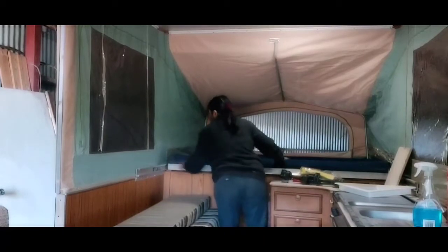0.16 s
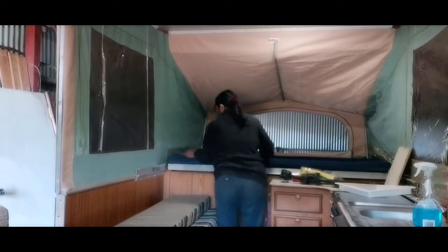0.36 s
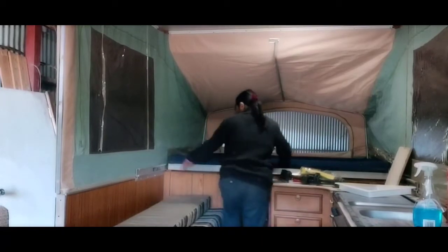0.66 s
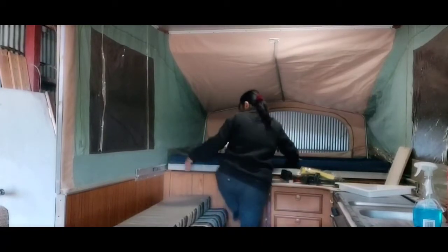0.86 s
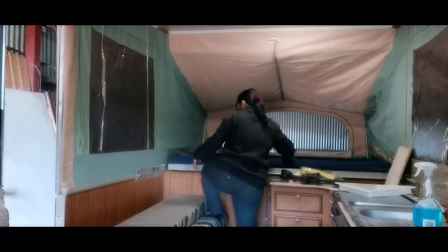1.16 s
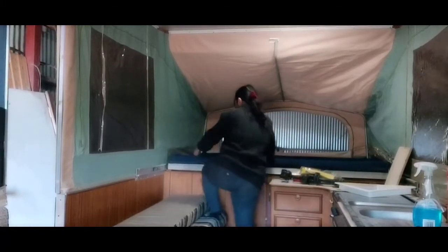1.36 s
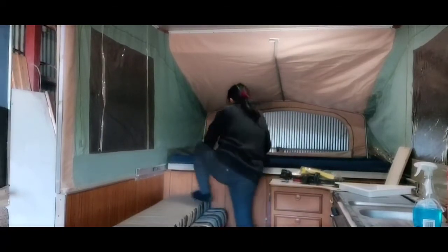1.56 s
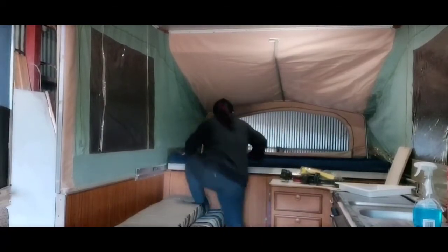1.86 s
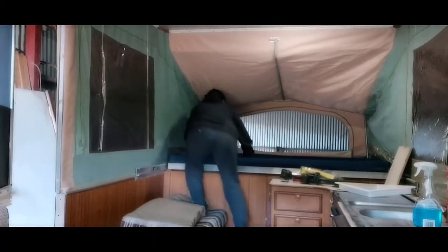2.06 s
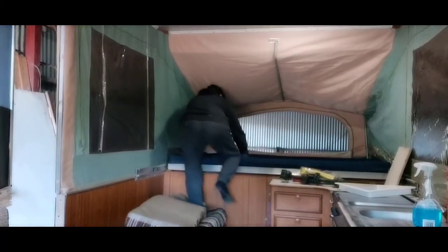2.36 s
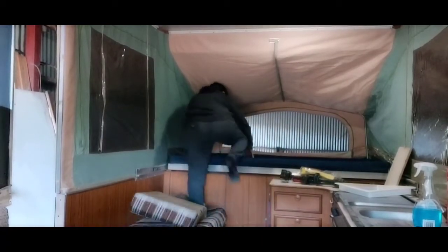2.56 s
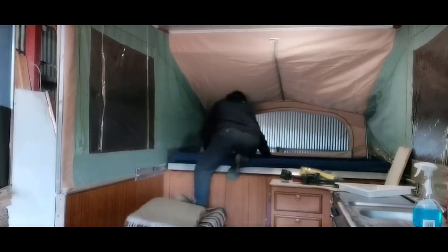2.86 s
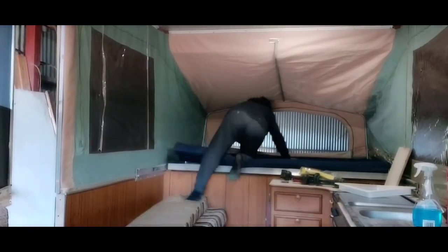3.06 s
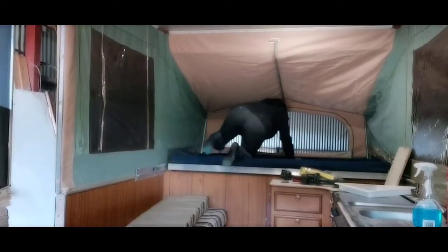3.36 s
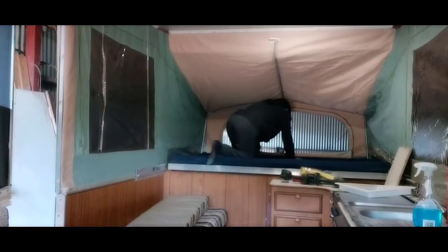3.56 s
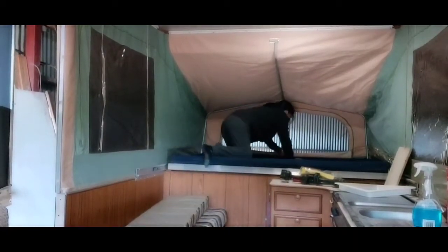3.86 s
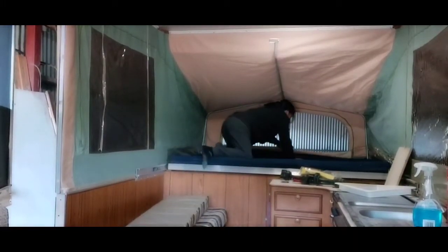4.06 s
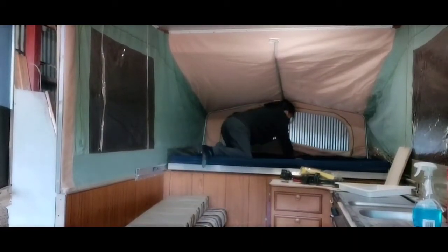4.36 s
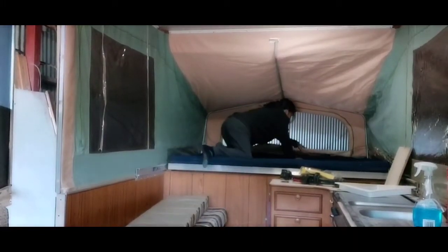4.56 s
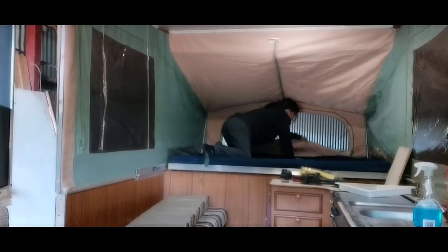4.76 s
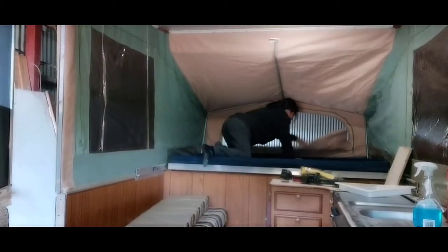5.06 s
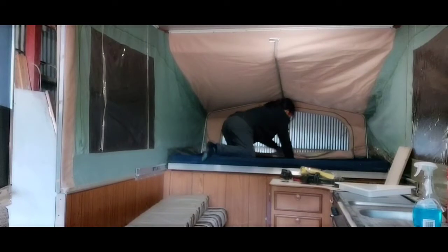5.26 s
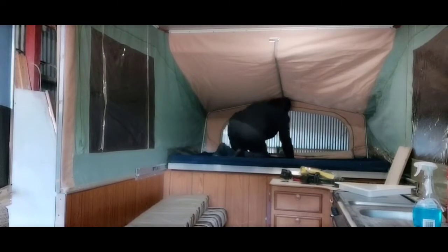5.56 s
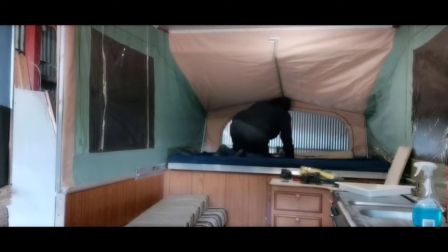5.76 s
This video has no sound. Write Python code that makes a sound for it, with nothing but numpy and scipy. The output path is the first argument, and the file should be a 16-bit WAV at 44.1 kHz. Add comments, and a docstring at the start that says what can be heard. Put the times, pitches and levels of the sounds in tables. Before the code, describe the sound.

A few metres away in a small, dry tent caravan, cloth swishes over bedding. A sharp hand knock on wood comes first, then low padded thumps, bassy wind puffs mostly on the left of the stereo microphone, and metallic clicks as weight climbs onto the bunk. From about four seconds stiff canvas crackles and snaps in short tugs, loudest near the end, with dull knee bumps beneath.

```python
"""Clothes and bedding rub as someone clambers from a bench onto the mattress of a small tent caravan, a few metres
from the microphone: coloured noise and random snags swell with every move. A canvas window flap crackles, creases
and squeaks; knees and hands bump the wooden bunk and knock its edge, and metal fittings click, as noise bursts
with ringing modes. A draught puffs on the two microphone ports as short runs of pressure dips.
The little cabin adds a short, dry echo of decaying noise."""
import sys
import numpy as np
from scipy import signal
from scipy.fft import rfft, irfft
from scipy.io import wavfile
from scipy.ndimage import uniform_filter1d

SR = 44100
rng = np.random.default_rng(int(sys.argv[2]) if len(sys.argv) > 2 else 0)


def unload_wav(signal):
    """Save mono or channel-first audio to the path in sys.argv[1] as 16-bit WAV at rate SR, clipped to [-1, 1]."""
    wavfile.write(
        sys.argv[1],
        SR,
        np.round(np.clip(np.atleast_2d(signal).T, -1, 1) * 32767).astype(np.int16),
    )


N = 261072
T = np.arange(N) / SR
RING = T[:SR // 2]  # the half second in which a struck thing or an echo dies away
CABIN_T60_S = 0.19


def undb(db):
    """Decibels to gain."""
    return 10 ** (np.asarray(db) / 20)


def unit(x):
    """Scale to rms 1."""
    return x / np.sqrt(np.mean(x ** 2))


def norm(x):
    """Scale each channel of a response to energy 1."""
    return x / np.sqrt(np.sum(x ** 2, axis=-1, keepdims=True))


def peak(x):
    """Scale to peak 1."""
    return x / np.abs(x).max()


def colour(x, points):
    """Weight a sound's spectrum by (pitch_hz, level_db) points, joined along a logarithmic pitch axis."""
    hz, db = np.transpose(points)
    size = x.shape[-1]
    f = np.maximum(np.fft.rfftfreq(size, 1 / SR), 1)
    gain = undb(np.interp(np.log(f), np.log(hz), db))
    return irfft(rfft(x) * gain, size)


def butter(x, hz, kind, order=2):
    """Plain low-pass or high-pass."""
    sections = signal.butter(order, min(hz, SR / 2 - 1), kind, fs=SR, output="sos")
    return signal.sosfilt(sections, x)


def add(out, s, x):
    """Mix a sound in at time s."""
    i = int(s * SR)
    out[..., i:i + x.shape[-1]] += x[..., :N - i]


def through(x, response):
    """Play a sound through a stereo response."""
    return signal.fftconvolve(np.atleast_2d(x), response, axes=-1)[:, :N]


def fade(t60):
    """Exponential decay, 60 dB down after t60 seconds."""
    return np.exp(-np.log(1000) * RING / t60)


def walk(rate):
    """Smoothed chance with rms near 1, taking a new value rate times a second."""
    k = int(SR / rate)
    steps = np.repeat(rng.standard_normal(N // k + 1), k)
    return unit(uniform_filter1d(steps, k))[:N]


def field(size, apart_hz=850, side_db=-1):
    """Diffuse noise at two close ports: the bass is shared, the treble nearly unrelated."""
    mid, side = rng.standard_normal((2, size))
    side = undb(side_db) * butter(side, apart_hz, "high")
    return np.array([mid + side, mid - side])


def body(modes, points, crack_t60, ring_db, cabin_db, vary_db=2):
    """A struck thing: a dense crack, its ringing modes and the cabin's echo; mode levels vary from blow to blow."""
    crack = norm(colour(field(len(RING)), points) * fade(crack_t60))
    ring = 0
    for hz, db, t60 in modes:
        # short waves reach the ports out of step
        phase = rng.uniform(-np.pi, np.pi, (2, 1)) * min(hz / 2000, 1)
        level = undb(db + vary_db * rng.standard_normal())
        ring = ring + level * fade(t60) * np.sin(2 * np.pi * hz * RING + phase)
    echo = norm(colour(field(len(RING)), points) * fade(CABIN_T60_S))
    return crack + undb(ring_db) * norm(ring) + undb(cabin_db) * echo


def patchy(x, depth_db):
    """Brief narrow patches of the spectrum swell and sink, as creases do at their own pitches."""
    spectrum = signal.stft(x, nperseg=512)[2]
    chance = rng.standard_normal(spectrum.shape[1:])
    chance = uniform_filter1d(chance, size=5, axis=0)  # neighbouring pitches move together
    chance = unit(uniform_filter1d(chance, size=3, axis=1))  # and hold for a moment
    return signal.istft(spectrum * undb(depth_db * chance))[1][:, :N]


def rub(points, rate, spread_db, grain_db, flutter_db, patchy_db, comb_db):
    """Friction: fibres snag and let go over a smooth hiss; the near walls scatter the snags and comb the hiss."""
    sizes = undb(spread_db * np.minimum(rng.exponential(size=N), 4))
    snags = (rng.random(N) < rate / SR) * rng.choice([-1, 1], N) * sizes
    scatter = norm(field(len(RING)) * (fade(.012) + undb(-17) * fade(CABIN_T60_S)))
    reflected = through(rng.standard_normal(N), field(len(RING)) * fade(CABIN_T60_S))
    hiss = unit(field(N)) + undb(comb_db) * unit(reflected)
    sound = unit(hiss) + undb(grain_db) * unit(through(snags, scatter))
    sound = patchy(colour(sound, points), patchy_db)
    return unit(sound * undb(flutter_db * walk(45)))


STROKE_SHAPE = 1.31  # 1 is a pointed swell, 2 a round bell


def strokes(rows, rest_db=-120):
    """Gain over time of (peak_s, rise_s, fall_s, level_db) strokes: each swells and dies away, and powers add."""
    power = undb(rest_db) ** 2
    for s, rise, fall, db in rows:
        away = np.abs(T - s) / np.where(T < s, rise, fall)
        power = power + (undb(db) * np.exp(-away ** STROKE_SHAPE)) ** 2
    return np.sqrt(power)


# a limb moves on the bed, sliding its sleeve or trouser leg and pressing on the bedding:
# fastest_s, rise_s, fall_s, slide_db, press_db (cushions and rumble add a gain to press_db)
LIMB_MOVES = [(0.032, 0.34, 0.35, -57.5, -58), (0.24, 0.014, 0.12, -50, -51),
              (0.34, 0.04, 0.14, -53, -57.5), (0.55, 0.2, 0.14, -56, -56.5),
              (0.72, 0.057, 0.08, -60.5, -57.5), (0.95, 0.29, 0.2, -71, -62),
              (1.17, 0.034, 0.058, -56, -43), (1.38, 0.19, 0.072, -66, -59),
              (1.59, 0.097, 0.16, -53, -57.5), (1.716, 0.065, 0.035, -47.5, -55.5),
              (1.97, 0.081, 0.1, -61, -52), (2.33, 0.22, 0.18, -75, -63.5), (2.6, 0.082, 0.092, -64.5, -62),
              (2.89, .015, 0.093, -55, -66), (3.008, 0.069, 0.064, -48, -48.5),
              (3.231, 0.084, 0.049, -48, -51.5), (3.735, 0.029, 0.081, -58, -56),
              (3.85, 0.045, 0.036, -57, -53), (4.01, 0.046, 0.065, -56, -54),
              (4.311, 0.15, 0.048, -53, -59.5), (4.555, 0.13, 0.09, -61, -62),
              (4.79, 0.063, 0.028, -55, -71), (4.93, 0.064, 0.085, -53, -54.5),
              (5.03, 0.028, 0.058, -54, -54), (5.25, 0.053, 0.051, -52, -56),
              (5.425, 0.065, 0.073, -41, -59), (5.6, 0.043, 0.031, -57.5, -59.5),
              (5.739, 0.017, 0.024, -52, -57), (5.8, 0.027, 0.036, -51.5, -56),
              (5.905, 0.054, 0.066, -54.5, -56)]


def sliding(rest_db):
    """How strongly cloth slides over cloth, never quite still."""
    return strokes([(s, rise, fall, slide) for s, rise, fall, slide, press in LIMB_MOVES], rest_db)


def pressing(rest_db, gain_db=0):
    """How hard the limbs work into the bedding, never quite at rest."""
    return strokes([(s, rise, fall, press + gain_db) for s, rise, fall, slide, press in LIMB_MOVES], rest_db)


# spectrum of sleeves and trouser legs: pitch_hz, level_db
CLOTHES_COLOUR = [(1200, -17), (2200, 2), (3700, -1), (6000, -0.5), (8500, -4), (12000, -5), (15500, -7)]
# spectrum of the mattress cover: pitch_hz, level_db
COVER_COLOUR = [(450, 1.5), (750, 1.5), (1000, 2), (1500, -2), (2300, -8), (3500, -12.5), (7000, -38)]
# spectrum of the cushions: pitch_hz, level_db
CUSHION_COLOUR = [(150, -5), (260, -2), (400, -1), (600, -10.5), (850, -18.5), (1400, -37), (3000, -66)]
# the body is never quite still: steady level of each rubbing
CLOTHES_REST_DB, COVER_REST_DB, CUSHION_REST_DB = -72, -64, -58
CUSHION_GAIN_DB = 2  # cushion scuff relative to the press
FIDGET_DB, FIDGET_PER_S = 1.5, 5


def fabrics():
    """Clothes swish grainily as they slide; pressed cover scrapes and cushions scuff dully, in fits and starts."""
    clothes = sliding(CLOTHES_REST_DB) * rub(
        CLOTHES_COLOUR, rate=1000, spread_db=1.0, grain_db=-4.5, flutter_db=1.0, patchy_db=1.86, comb_db=4.5)
    cover = pressing(COVER_REST_DB) * rub(
        COVER_COLOUR, rate=200, spread_db=3.0, grain_db=-5, flutter_db=0.5, patchy_db=1.5, comb_db=-9)
    cushion = pressing(CUSHION_REST_DB, gain_db=CUSHION_GAIN_DB) * rub(
        CUSHION_COLOUR, rate=150, spread_db=1, grain_db=-6.5, flutter_db=2.0, patchy_db=1.5, comb_db=-14)
    return (clothes + cover + cushion) * undb(FIDGET_DB * walk(FIDGET_PER_S))


# spectrum of the stiff canvas: pitch_hz, level_db
CANVAS_COLOUR = [(750, -37), (1150, 2), (1450, 4.5), (2200, 4.5), (2900, 1.5), (4000, -11), (5500, -7.5),
                 (8000, -13.5)]
# the canvas window flap is tugged: fastest_s, rise_s, fall_s, level_db
FLAP_TUGS = [(3.99, 0.037, 0.038, -49.5), (4.26, 0.17, 0.11, -58), (4.53, 0.0088, 0.035, -53.5),
             (4.795, 0.021, 0.039, -52), (5.02, 0.17, 0.15, -58.5), (5.22, 0.035, 0.039, -53.5),
             (5.36, 0.0097, 0.054, -48), (5.412, 0.058, 0.072, -44), (5.8, 0.059, 0.068, -52.5)]
# a stiff fold of canvas or mattress cover snaps or scrapes over:
# start_s, peak level_db, pitch_hz, width_octaves (2 at most is used), t60_s
FOLD_SNAPS = [(0.312, -43, 2780, .35, .11), (0.381, -45, 2900, .3, 0.088), (0.685, -45, 990, .25, 0.095),
              (0.716, -43, 980, 0.24, 0.11), (0.728, -46.5, 1880, .25, .07), (3.704, -41, 900, 1.3, .04),
              (3.95, -45.5, 1900, 0.43, 0.11), (3.976, -38.5, 1590, .7, .05), (4.011, -40, 2200, 1, .06),
              (4.129, -44.5, 1580, .3, 0.045), (4.223, -44.5, 1500, 0.34, 0.065),
              (4.275, -44.5, 2580, 0.65, 0.17), (4.307, -41, 1700, 1.6, .05), (4.525, -46, 2430, 1, .05),
              (4.548, -40.5, 1700, 1.2, .05), (4.745, -42.5, 2330, 0.46, 0.054), (4.787, -38, 1800, 1, .07),
              (4.97, -41.5, 1390, .35, .07), (5.014, -38, 1190, 0.82, .04), (5.026, -37, 2400, 1.1, 0.095),
              (5.254, -39, 1150, .7, 0.044), (5.347, -38, 2070, 0.88, 0.055),
              (5.386, -34, 2700, 0.66, 0.08), (5.42, -33, 2600, 1.1, .05), (5.736, -50, 2880, .2, .12),
              (5.788, -41.5, 1350, .5, 0.084), (5.798, -39.5, 2830, 1.2, .06)]


def flap():
    """Stiff canvas crackles as it is drawn along; now and then a fold snaps over and rasps at its own pitch."""
    crackle = rub(
        CANVAS_COLOUR, rate=150, spread_db=3, grain_db=3, flutter_db=1.5, patchy_db=4, comb_db=0.5)
    out = strokes(FLAP_TUGS) * crackle
    for s, db, hz, octaves, t60 in FOLD_SNAPS:
        reach = 2 ** min(octaves, 2)
        points = [(100, -60), (hz / reach, -24), (hz, 0), (hz * reach, -17), (15000, -38)]
        fold = colour(field(len(RING)), points)
        snap = fold * (fade(t60) + undb(-16) * fade(CABIN_T60_S))
        add(out, s, undb(db) * peak(snap))
    return out


CREASES_PER_S, CREASE_HZ = 130, 2333
CREASE_REACH_OCTAVES = 1.334  # pitches lie this far either way
CREASE_DECAY_CYCLES = 6.25  # to fall to 1/e
CREASE_DB, CREASE_SPREAD_DB = -9.5, 2.5  # relative to the cloth's motion; scatter of sizes


def creases():
    """Small creases buckle one by one in tiny pitched crackles, louder the more the cloth is moving."""
    out = np.zeros((2, N))
    t = RING[:SR // 20]
    for when, pitch, size, lag in rng.random((int(CREASES_PER_S * N / SR), 4)):
        hz = CREASE_HZ * 2 ** (CREASE_REACH_OCTAVES * (2 * pitch - 1))
        # opposite phase shifts at the two ports, larger for short waves
        phase = np.array([[1], [-1]]) * (2 * lag - 1) * min(hz / 2000, 2)
        ring = np.sin(2 * np.pi * hz * t + phase) * np.exp(-hz * t / CREASE_DECAY_CYCLES)
        level = undb(CREASE_SPREAD_DB * min(-np.log(1 - size), 3))
        add(out, when * N / SR, level * ring)
    motion = np.hypot(strokes(FLAP_TUGS), sliding(CLOTHES_REST_DB) / 2)
    return undb(CREASE_DB) * unit(out) * motion


# thin squeaks while the flap is handled: start_s, level_db, length_s
THIN_SQUEAKS = [(4.609, -67, 0.031), (5.04, -59, 0.082), (5.15, -61, 0.079)]
SQUEAK_HZ = 11300


def squeaks():
    """A small hard part slides and sings briefly in one narrow band."""
    out = np.zeros((2, N))
    band = [(SQUEAK_HZ * .92, -40), (SQUEAK_HZ, 0), (SQUEAK_HZ * 1.08, -40)]
    tone = unit(colour(field(N), band))
    for s, db, length in THIN_SQUEAKS:
        i, size = int(s * SR), int(length * SR)
        add(out, s, undb(db) * np.hanning(size) * tone[:, i:i + size])
    return out


# hands, knees and feet land on the bunk:
# start_s, level_db (peak, before a 3 dB cut), landing_s (time the weight takes), hardness_hz (low-pass)
BUNK_BUMPS = [(0.231, -24.5, 0.0027, 600), (0.252, -24.5, 0.07, 135), (1.142, -20, 0.024, 230),
              (1.162, -22, 0.018, 250), (1.204, -22.5, 0.039, 252), (1.935, -31, 0.069, 600),
              (2.129, -36, 0.066, 160), (2.276, -38, 0.017, 398), (2.603, -19.5, 0.002, 131),
              (2.87, -33, 0.0024, 595), (2.911, -30.5, 0.021, 380), (2.953, -32, 0.0028, 350),
              (2.994, -30.5, 0.025, 397), (3.228, -30, 0.023, 553), (3.685, -24.5, 0.005, 160),
              (3.714, -31, 0.038, 382), (3.821, -32.5, 0.026, 300), (4.021, -36, 0.027, 350),
              (4.531, -32.5, 0.025, 302), (5.035, -30, 0.031, 350), (5.346, -27.5, 0.0016, 1200),
              (5.605, -30.5, 0.035, 241), (5.888, -37.5, .006, 600)]
# ringing modes of the bunk's frame: pitch_hz, level_db, t60_s
FRAME_MODES = [(116.4, 3, 0.17), (135.7, 0, 0.26), (176, 9.5, 0.13), (221.6, -2.5, 0.14), (340.3, -1, 0.24),
               (426, 0, 0.058)]
# spectrum of a padded blow: pitch_hz, level_db
THUD_COLOUR = [(30, -51), (80, 7.5), (150, 12), (400, -4.5), (900, -22), (2500, 1), (8000, -44)]
# spectrum of the rumbling bunk: pitch_hz, level_db
RUMBLE_COLOUR = [(20, -19), (40, -24), (65, -4), (105, 3.5), (165, -0.5), (230, -6.5), (330, -23.5),
                 (700, -43)]
RUMBLE_GAIN_DB, RUMBLE_REST_DB = 4.5, -50  # relative to the press; under a resting body
LURCH_DB, LURCH_PER_S = 1.5, 18  # the weight shifts unevenly, so the rumble comes and goes


def bunk():
    """Soft, padded blows set the wooden frame booming; it rumbles on as the weight shifts."""
    out = np.zeros((2, N))
    for s, db, length, hard_hz in BUNK_BUMPS:
        t = np.arange(int(length * SR)) / SR
        push = 0.97 * unit(rng.standard_normal(len(t))) * np.exp(-t / length) / np.sqrt(len(t))
        push[0] -= .7  # first touch, then the padding crushes
        frame = body(FRAME_MODES, THUD_COLOUR, crack_t60=0.084, ring_db=5.5, cabin_db=6.0)
        boom = signal.fftconvolve(push[None], frame, axes=-1)
        add(out, s, undb(db - 3.0) * peak(butter(boom, hard_hz, "low")))
    rumble = unit(colour(field(N, apart_hz=243), RUMBLE_COLOUR) * undb(LURCH_DB * walk(LURCH_PER_S)))
    return out + pressing(RUMBLE_REST_DB, gain_db=RUMBLE_GAIN_DB) * rumble


# hands and feet knock on the bed's wooden edge, fingers just before the palm:
# start_s, level_db (peak, before a 5 dB cut), brightness_hz (low-pass)
EDGE_KNOCKS = [(0.2245, -21, 6000), (0.2267, -16.5, 6000), (0.2285, -17, 1400), (0.2302, -27, 8000),
               (1.163, -24.5, 6000), (1.175, -25.5, 5000), (1.184, -31, 4000), (2.603, -34.5, 1000),
               (2.959, -30, 1000), (5.347, -25.5, 700)]
# ringing modes of the wooden edge: pitch_hz, level_db, t60_s
EDGE_MODES = [(464, 2, 0.068), (656, 6.5, 0.024), (828, 12, 0.034), (1055, 4, 0.011), (1560, -4, .05),
              (1756, 8.5, 0.044), (1810, 12, 0.015)]
# spectrum of the struck wood: pitch_hz, level_db
WOOD_COLOUR = [(150, -5), (450, -3), (800, 1), (1100, 5), (1400, 0), (1850, 3.5), (2300, -12), (3300, -8),
               (5000, -14), (15000, -26)]


def knock():
    """Quick, dry contacts on the wooden edge; flesh sounds duller than knuckle."""
    out = np.zeros((2, N))
    for s, db, bright_hz in EDGE_KNOCKS:
        rap = body(EDGE_MODES, WOOD_COLOUR, crack_t60=.016, ring_db=-1, cabin_db=-6, vary_db=1)
        add(out, s, undb(db - 5.0) * peak(butter(rap, bright_hz, "low")))
    return out


# fittings take the load and click; the tick at 4.743 s is stiff canvas, played with the same ring:
# start_s, level_db (peak, before a 3 dB cut), brightness_hz (low-pass)
CLICKS_AND_TICK = [(1.144, -35, 11000), (1.162, -26, 12000), (1.169, -36, 5000), (1.989, -28.5, 4000),
                   (2.0644, -25.5, 5500), (2.243, -59, 15000), (2.489, -46, 14000), (2.65, -42.5, 9200),
                   (2.874, -43.5, 12200), (2.958, -19.5, 8000), (2.9593, -18.5, 8000), (3.118, -37.5, 9050),
                   (4.743, -37, 12100), (5.202, -43, 9000)]
# ringing modes of the fittings: pitch_hz, level_db, t60_s
FITTING_MODES = [(780, -2, 0.087), (950, -1, 0.2), (1430, -3, 0.15), (1732, 0.5, 0.073), (2436, 9, 0.069),
                 (2700, 10, 0.08), (2940, 3, 0.066), (3120, 0.5, 0.18), (3493, 9.5, 0.078), (3790, 3, .07),
                 (4180, 7, 0.05), (4400, 0, 0.12), (4900, 0, 0.11), (5540, 5.5, 0.1), (5960, 7, 0.06),
                 (6180, 11, 0.08)]
# spectrum of the struck metal: pitch_hz, level_db
METAL_COLOUR = [(300, -10), (900, -11.5), (1800, -6.5), (3200, -0.5), (6000, -4), (9000, -7), (15000, -8.5)]


def fittings():
    """Loose metal parts snap under load, brighter when the contact is hard; one tick stands for stiff canvas."""
    out = np.zeros((2, N))
    for s, db, bright_hz in CLICKS_AND_TICK:
        click = body(FITTING_MODES, METAL_COLOUR, crack_t60=.065, ring_db=-4, cabin_db=-5)
        add(out, s, undb(db - 3.0) * peak(butter(click, bright_hz, "low", order=1)))
    return out


# slow gusts at the microphone: strongest_s, rise_s, fall_s, level_db (midway between the two ports)
SLOW_GUSTS = [(0.3, 0.35, 0.18, -45.5), (1.2, 0.29, 0.4, -42.5), (1.57, 0.19, 0.22, -36.5)]
GUST_PAN_DB = 7.5  # left minus right
# spectrum of the gusts' buffeting: pitch_hz, level_db
BUFFET_COLOUR = [(30, -7), (70, -2), (125, 1), (200, -14), (350, -28), (800, -59)]
# puffs of air right on the ports: middle_s, level_db (peak, louder port), left_minus_right_db,
# length_s (nominal, scaled below), eddy_hz (nominal, scaled below), sharpness
PORT_PUFFS = [(0.102, -28, -21.5, 0.022, 111, 1.45), (0.461, -31.5, -27, 0.053, 95, 1.8),
              (0.995, -25.5, 20, 0.013, 105, 2), (1.054, -24, -35, 0.042, 113.6, 1.65),
              (1.22, -19, -23, 0.023, 119, 1.6), (1.24, -21, 20, 0.014, 125, 1.3),
              (1.281, -22.5, 28, 0.0121, 144, 1.8), (1.328, -22, 30, 0.0044, 190, 1.7),
              (1.333, -9, 38, 0.0079, 160, 1.8), (1.346, -7, 44, 0.0089, 155, 2.0),
              (1.363, -16, 35, 0.011, 130, 1.5), (1.433, -25.5, 29, 0.012, 120, 1.5),
              (1.479, -20, 28, 0.0086, 160, 1.7), (1.486, -12.5, 30, 0.0068, 180, 3.3),
              (1.498, -17.5, 13.5, 0.01, 112, 1.4), (1.545, -26.5, 18, .011, 130, 1.3),
              (1.58, -29.5, -22, 0.05, 125, 1.2), (1.606, -25.5, 26, 0.017, 180, 1.8),
              (1.722, -17.5, 35, 0.0061, 191, 2), (1.818, -24.5, -22, 0.013, 95, 1.4),
              (3.32, -33.5, 18, .025, 98, 1.4), (3.425, -23.5, 29, 0.011, 104, 1.5),
              (4.995, -23.5, 29, 0.012, 129, 2.2), (5.418, -29, 23, 0.015, 126, 1.6)]


def draught():
    """Gusts buffet the ports; each puff is a few eddies of pressure, much stronger on one port than the other."""
    buffet = unit(colour(rng.standard_normal((2, N)), BUFFET_COLOUR))
    out = strokes(SLOW_GUSTS) * buffet * undb(np.array([[GUST_PAN_DB], [-GUST_PAN_DB]]) / 2)
    for s, db, pan_db, length, eddy_hz, sharp in PORT_PUFFS:
        t = np.arange(-int(2 * length * SR), int(2 * length * SR)) / SR
        swirl = unit(butter(rng.standard_normal(len(t)), eddy_hz, "low"))
        rate_hz = 0.636 * eddy_hz * np.exp(0.13 * swirl)  # the eddies pass unevenly
        phase = 2 * np.pi * np.cumsum(rate_hz) / SR
        # suction comes in sharp dips, the deepest in the middle
        eddies = np.exp(sharp * np.cos(phase - phase[len(t) // 2]))
        puff = -eddies * np.exp(-(1.33 * t / length) ** 2)
        puff = butter(puff, 107, "high")
        puff = butter(puff, 2.9 * sharp * eddy_hz, "low", order=5)
        ports = undb(np.minimum([[pan_db], [-pan_db]], 0))
        add(out, s - 2 * length, undb(db) * ports * peak(puff))
    return out


def scene():
    """Everything inside the caravan, and the draught at the microphone."""
    return fabrics() + flap() + creases() + squeaks() + bunk() + knock() + fittings() + draught()


TOP_HZ = 15650


def record(dry):
    """The microphone thins the deep bass and cuts the top."""
    thinned = butter(dry, 56.7, "high", order=3)
    return signal.sosfilt(signal.ellip(10, .2, 70, TOP_HZ, fs=SR, output="sos"), thinned)


dry = scene()
out = record(dry)
unload_wav(out)
```